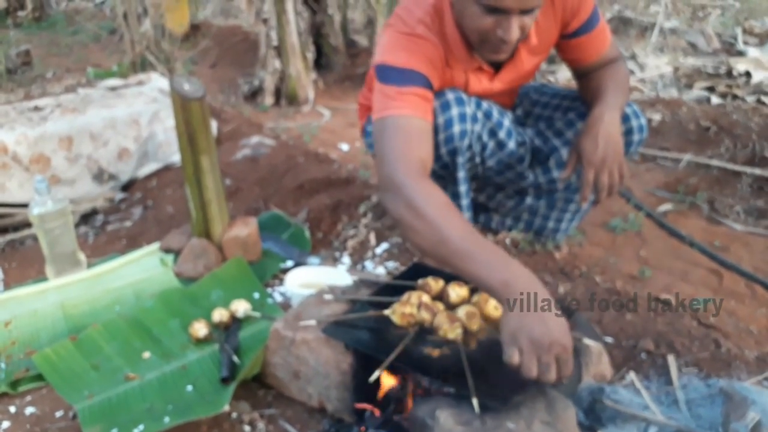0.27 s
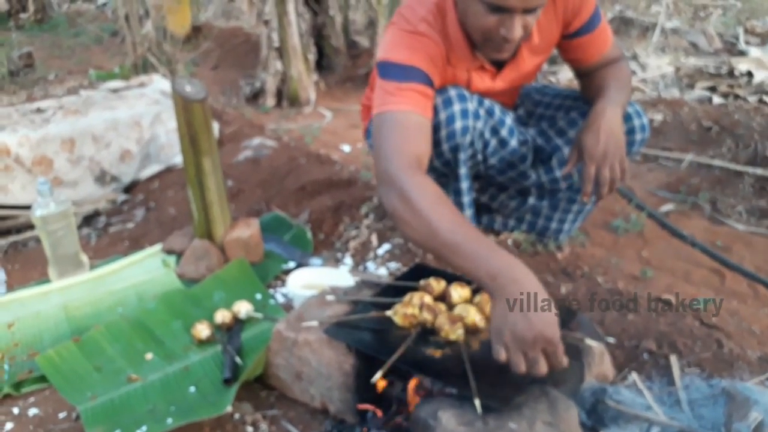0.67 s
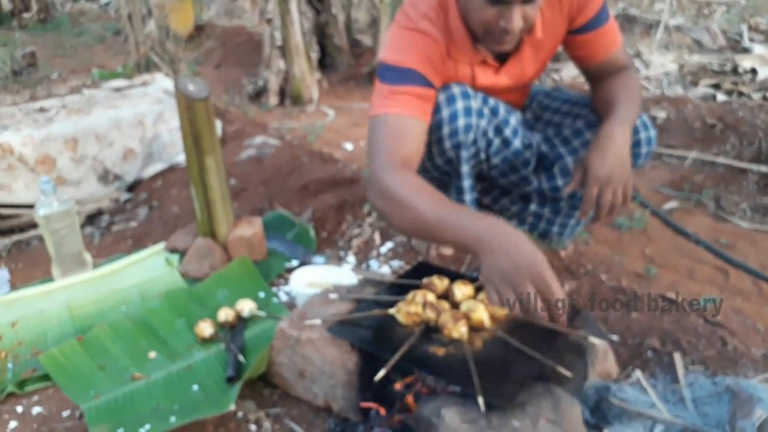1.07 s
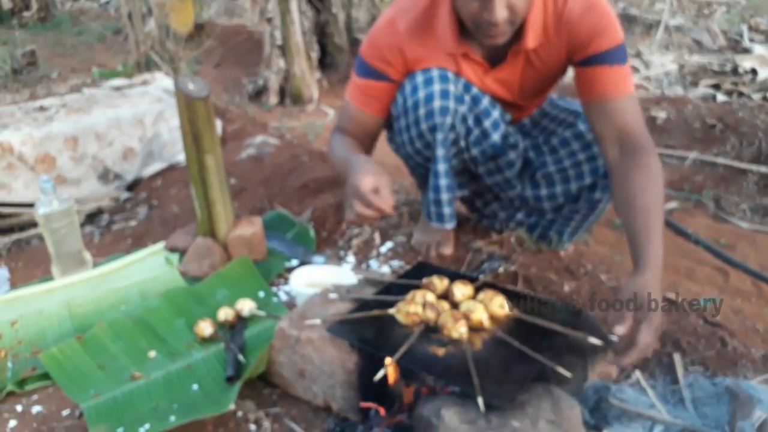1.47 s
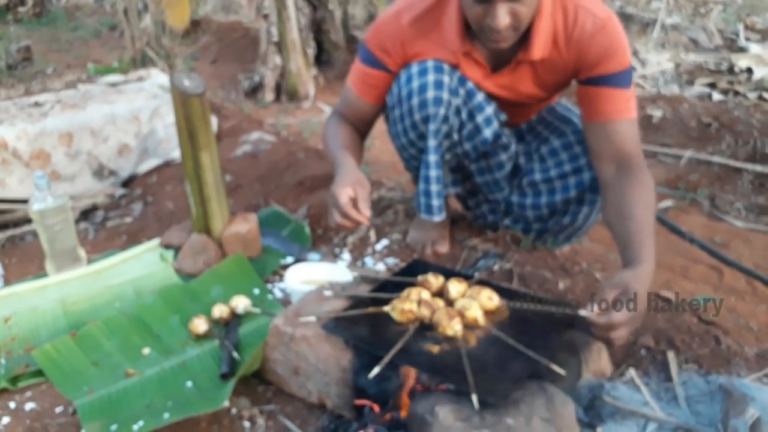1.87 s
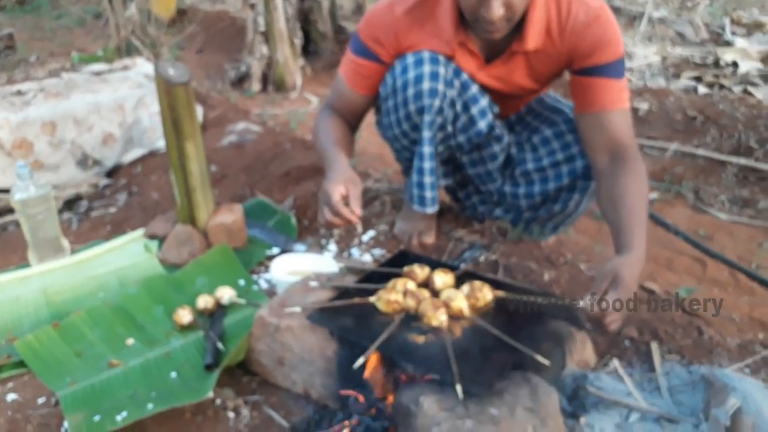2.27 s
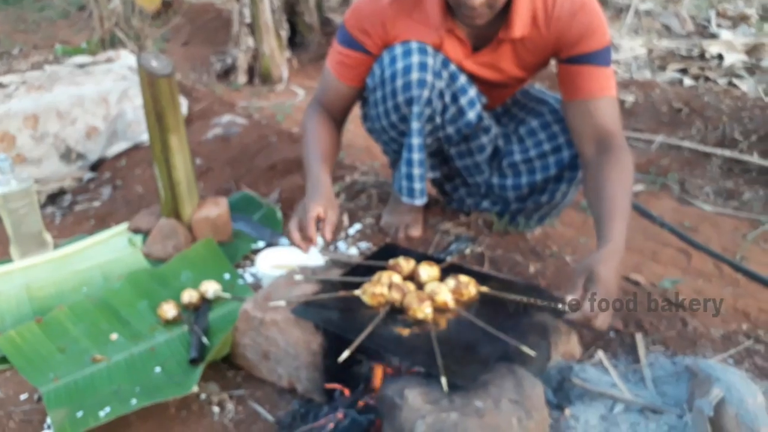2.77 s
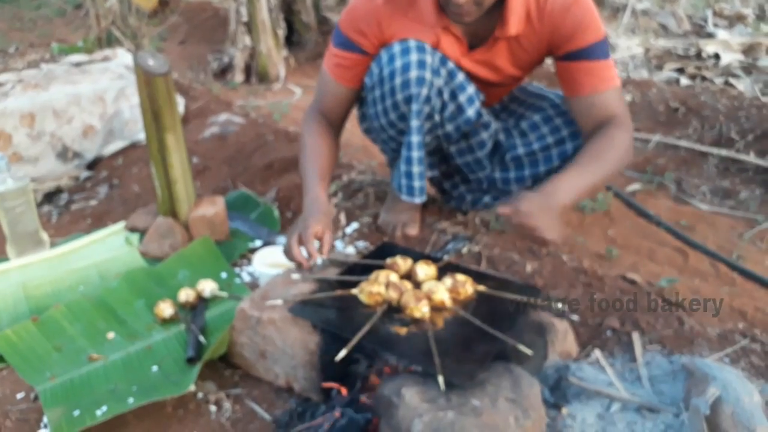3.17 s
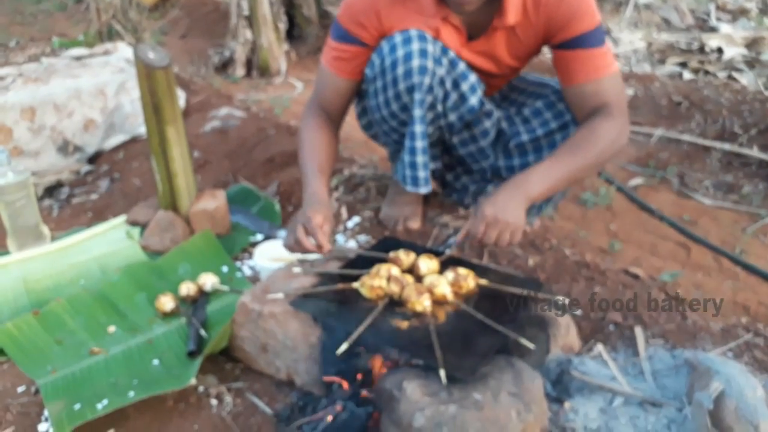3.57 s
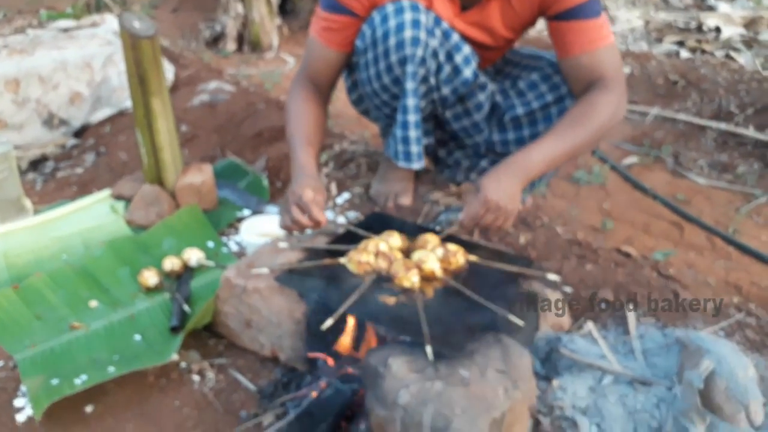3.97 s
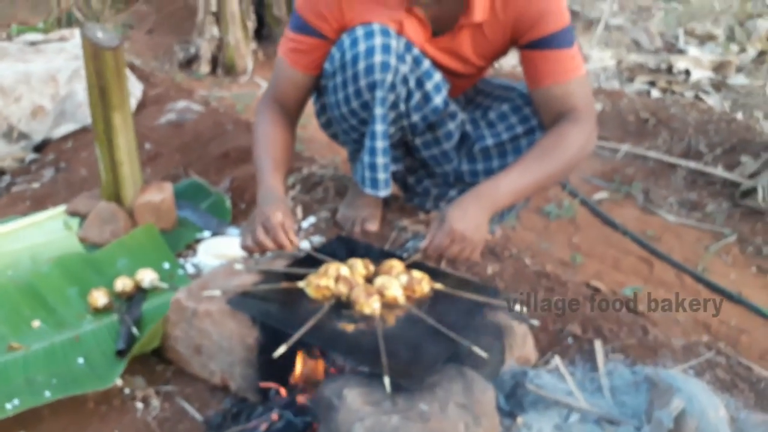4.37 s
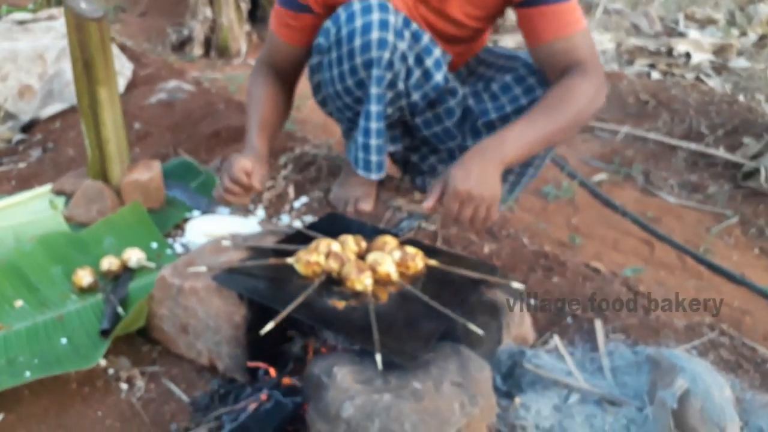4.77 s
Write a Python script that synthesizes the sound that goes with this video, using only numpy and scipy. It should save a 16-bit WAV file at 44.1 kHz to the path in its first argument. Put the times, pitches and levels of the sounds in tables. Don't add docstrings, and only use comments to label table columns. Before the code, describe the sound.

Close to a hand-held camera outdoors, oil fries steadily in a flat pan, bright and crackly, with a sharp pop around one and a half seconds. A small bird gives short falling whistles that echo among trees. Fingers tap the camera body softly, then scrape the microphone just before four seconds, and the sizzle turns dull and muffled to the end.

```python
import sys
import numpy as np
from scipy import signal
from scipy.fft import rfft, irfft, next_fast_len
from scipy.io import wavfile
from scipy.ndimage import uniform_filter1d, map_coordinates

SR = 44100
rng = np.random.default_rng(int(sys.argv[2]) if len(sys.argv) > 2 else 0)


def output_pcm(signal):
    pcm = np.clip(np.atleast_2d(signal).T, -1, 1) * 32767
    wavfile.write(sys.argv[1], SR, np.round(pcm).astype(np.int16))


def level_to_linear(level):
    exponent = np.asarray(level, float) / 20
    return 10 ** exponent


N = 221776


def unit(x):
    return x / np.sqrt(np.mean(x ** 2) + 1e-20)


def noise():
    return rng.standard_normal(N)


def along(points, hz):
    f, v = np.transpose(points)
    return np.interp(np.log(hz + 1), np.log(f + 1), v)


def curves(rows, size=N):
    s, *columns = np.transpose(rows)
    return [np.interp(np.arange(size) / SR, s, column) for column in columns]


def wobble(rate):
    knots = rng.standard_normal(int(N * rate / SR) + 4)
    return map_coordinates(knots, [np.arange(N) * rate / SR])


def filtered(x, response):
    m = next_fast_len(N + SR // 2)
    return irfft(rfft(x, m) * response(np.fft.rfftfreq(m, 1 / SR)), m)[..., :N]


def butter(x, order, hz, kind="low"):
    return signal.sosfilt(signal.butter(order, hz, kind, fs=SR, output="sos"), x)


def coloured(x, spectrum):
    cepstrum = irfft(np.log(level_to_linear(along(spectrum, np.fft.rfftfreq(4096, 1 / SR))) + 1e-6))
    cepstrum[1:2048] *= 2
    cepstrum[2049:] = 0
    response = irfft(np.exp(rfft(cepstrum)))[:2048]
    return signal.fftconvolve(x, response)[:len(x)]


# start_s, level_db
VIGOUR = [(0.0, -55.5), (0.27, -53), (0.55, -54.5), (1.12, -50.5), (1.69, -55.5), (1.89, -52.5),
          (2.13, -53.5), (2.23, -52), (3.4, -55), (3.73, -51.5), (3.84, -49.5), (4.41, -52), (4.92, -53.5),
          (5.03, -58.5)]


def frying_vigour():
    return curves(VIGOUR)[0]


# start_s, covered_share (0-1)
HAND_COVER = [
    (0, 0.26),
    (3.55, 0.28),
    (3.7, 0.41),
    (3.86, 0.64),
    (3.92, 0.91),
    (4.3, 0.96),
    (4.65, 1),
    (5.03, 1),
]


def hand_cover():
    return curves(HAND_COVER)[0]


# pitch_hz, level_db per Hz
OPEN_PORT = [(710, -58.5), (1200, -25.5), (1900, -15.5), (2830, -10.5), (3360, 2), (6950, 6.5), (8080, 2.5),
             (9610, -13.5), (12700, -15.5), (16000, -18)]
# pitch_hz, level_db per Hz
COVERED_PORT = [(710, -44.5), (1200, -50), (1850, -23), (2230, -11), (3180, -17), (3740, -1.5), (4130, -2),
                (5780, -11.5), (9210, -28.5), (12900, -21), (16000, -30.5)]


def at_port(x):
    def levelled(v):
        main_band = filtered(v, lambda hz: (hz > 3200) & (hz < 6000))
        return v / np.std(main_band)

    cover = hand_cover()
    return (1 - cover) * levelled(coloured(x, OPEN_PORT)) + cover * levelled(coloured(x, COVERED_PORT))


def ticks(per_second, spread_db, clump_db, clump_rate):
    moment, luck, direction = rng.random((3, N))
    size_db = np.minimum(-spread_db * np.log(luck + 1e-9), 15) + clump_db * wobble(clump_rate)
    return unit((moment < per_second / SR) * np.sign(direction - .5) * level_to_linear(size_db))


def patchy(x, depth_db):
    t, z = signal.stft(x, SR, nperseg=256)[1:]
    field = uniform_filter1d(rng.standard_normal(z.shape), size=8, axis=0)
    field = unit(uniform_filter1d(field, size=5, axis=1))
    depth = np.interp(t, np.arange(N) / SR, depth_db)
    return signal.istft(z * level_to_linear(-depth * abs(field)), SR, nperseg=256)[1][:N]


# pitch_hz, sharpness_q
POCKET_SIZES = [
    (3700, 1.85),
    (5400, 4.2),
    (7400, 7.3),
    (12500, 1.9),
]


def sizzle():
    cover, body_db = hand_cover(), frying_vigour()
    spray_db = body_db - 2.5 - 1.15 * np.arange(N) / SR - 15 * cover
    clumps = level_to_linear(np.minimum(1.1 * wobble(90), 1.5) + 0.3 * wobble(10))
    bed = clumps * noise()
    bursts = level_to_linear(-1.0) * ticks(per_second=720, spread_db=3.0, clump_db=4.0, clump_rate=120)
    for hz, q in POCKET_SIZES:
        b, a = signal.iirpeak(hz, max(q, .3), SR)
        pushes = ticks(per_second=420, spread_db=5.0, clump_db=1.0, clump_rate=29)
        bursts = bursts + 1.48 * signal.lfilter(b, a, pushes)
    fading = signal.lfilter([1], [1, -level_to_linear(-120 / (0.006 * SR))], bursts ** 2)
    bursts = clumps ** 0.5 * (bursts + 0.2 * np.sqrt(fading) * noise())
    sound = at_port(level_to_linear(-7.0) * unit(bed) + unit(bursts))
    spray = filtered(sound, lambda hz: 1 / (1 + (9000 / (hz + 1)) ** 12))
    slow_level = np.sqrt(abs(uniform_filter1d(spray ** 2, size=SR // 5, mode="reflect")))
    patches = patchy(spray / slow_level, 2 + 3 * cover)
    return level_to_linear(body_db) * (sound - spray) + level_to_linear(spray_db + 7.5) * patches


def minor_spits():
    per_second = 34
    count = int(per_second * N / SR)
    s = (np.arange(count) + rng.random(count)) / per_second
    size, pitch, spray = np.clip(rng.standard_normal((count, 3)), -1.6, 1.6).T
    cover = hand_cover()[(s * SR).astype(int)]
    hz = (6500 + (4440 - 6500) * cover) * np.exp(0.087 * pitch)
    return np.transpose([s + .001, -41 + 3 * size, hz, -30 + 2 * spray - 29 * cover])


# start_s, peak level_db, pocket pitch_hz,
# spray_db
DISTINCT_SPITS = [(0.0074, -32.0, 7100.0, -16), (0.0819, -34.0, 6050.0, -19), (0.0844, -31.5, 6640.0, -9),
                  (0.1285, -32.0, 4780.0, -15), (0.1495, -33.5, 6250.0, -10), (0.3655, -32.5, 5610.0, -31),
                  (0.3853, -35.5, 7860.0, -18), (0.443, -33.0, 6210.0, -11), (0.4744, -34.5, 6710.0, -9),
                  (0.5508, -35.5, 4780.0, -18), (0.5547, -33.0, 6230.0, -19), (0.634, -33.0, 6220.0, -12),
                  (0.6522, -33.5, 7140.0, -15), (0.6793, -33.0, 6130.0, -15), (0.8084, -32.0, 5860.0, -14),
                  (0.8775, -30.5, 5370.0, -10), (0.9068, -32.5, 7140.0, -7), (0.9334, -28.0, 5710.0, -1),
                  (0.9648, -30.0, 4930.0, -14), (0.9699, -27.0, 7290.0, -16), (1.0087, -32.0, 6880.0, -16),
                  (1.0317, -30.5, 7090.0, -7), (1.0751, -30.0, 7340.0, -11), (1.1299, -26.0, 7350.0, -11),
                  (1.2188, -21.5, 6620.0, -9), (1.2587, -30.0, 6060.0, -20), (1.3506, -33.5, 7240.0, -16),
                  (1.3597, -32.0, 6860.0, -16), (1.4142, -31.5, 7230.0, -10), (1.4433, -32.0, 6710.0, -10),
                  (1.4576, -14.0, 5450.0, -21), (1.4605, -28.5, 5720.0, -18), (1.5032, -33.0, 6050.0, -7),
                  (1.512, -31.0, 5710.0, -9), (1.5163, -30.0, 6330.0, -10), (1.5225, -30.0, 6540.0, -12),
                  (1.5629, -29.5, 7060.0, -10), (1.5719, -33.5, 5630.0, -12), (1.5757, -26.5, 4700.0, -16),
                  (1.6007, -34.0, 6940.0, -7), (1.6441, -31.5, 6180.0, -11), (1.6488, -33.5, 5170.0, -16),
                  (1.778, -32.0, 7130.0, -16), (1.7934, -29.5, 6420.0, -6), (1.8204, -36.0, 7250.0, -12),
                  (1.9715, -29.0, 6040.0, -2), (2.0259, -28.0, 5200.0, -18), (2.1697, -30.5, 6030.0, -10),
                  (2.19, -34.0, 6300.0, -16), (2.2272, -27.5, 6690.0, -11),
                  (3.5454, -31.0, 6510.0, -13), (3.5667, -34.5, 5660.0, -16), (3.6091, -28.5, 6050.0, -16),
              (3.6138, -34.0, 5250.0, -11), (3.6316, -32.0, 4080.0, -26), (3.7582, -21.5, 5210.0, -11),
              (3.7727, -24.5, 4820.0, -26), (3.7838, -26.5, 5140.0, -17), (3.7984, -24.0, 4960.0, -26),
              (3.8014, -26.0, 4370.0, -9), (3.8855, -10.5, 5340.0, -25), (3.8937, -11.5, 4240.0, -21),
              (3.9789, -29.5, 4760.0, -18), (4.0156, -35.0, 4380.0, -22), (4.0321, -33.0, 4230.0, -27),
              (4.0422, -34.0, 4920.0, -29), (4.1141, -32.5, 4480.0, -13), (4.1656, -34.5, 5010.0, -21),
              (4.1798, -33.5, 4090.0, -22), (4.1992, -33.5, 5170.0, -22), (4.2327, -33.5, 4060.0, -28),
              (4.2626, -33.0, 4020.0, -6), (4.2774, -33.0, 4160.0, -25), (4.2946, -36.5, 5080.0, -24),
              (4.3122, -34.5, 4740.0, -20), (4.3202, -34.0, 5360.0, -19), (4.3283, -24.0, 4810.0, -23),
              (4.3463, -30.5, 4180.0, -11), (4.3494, -35.0, 4310.0, -21), (4.377, -28.0, 4030.0, -26),
              (4.3964, -33.5, 4450.0, -23), (4.4268, -35.0, 4190.0, -26), (4.4308, -35.5, 4390.0, -30),
              (4.4626, -30.0, 4330.0, -35), (4.4807, -33.5, 4550.0, -35), (4.5213, -38.0, 4270.0, -26),
              (4.5405, -33.0, 4160.0, -28), (4.5673, -34.0, 4440.0, -26), (4.583, -35.5, 4310.0, -26),
              (4.6114, -38.0, 4270.0, -32), (4.6209, -26.5, 4150.0, -25), (4.6385, -33.5, 4320.0, -26),
              (4.6463, -29.5, 4210.0, -27), (4.7548, -30.0, 4560.0, -46), (4.767, -27.5, 4100.0, -24),
              (4.8243, -30.5, 4220.0, -34), (4.841, -26.5, 4300.0, -22), (4.8758, -34.0, 4320.0, -29),
              (4.9237, -37.5, 4160.0, -21),
                  (2.2426, -31.0, 6740.0, -13), (2.2559, -27.5, 6280.0, -4), (2.2619, -30.0, 6690.0, -10),
                (2.2649, -30.0, 5360.0, -15), (2.2672, -27.0, 4350.0, -15), (2.3, -32.0, 6110.0, -22),
                (2.3282, -33.0, 7040.0, -17), (2.359, -31.5, 6200.0, -26), (2.4085, -29.0, 5450.0, -5),
                (2.546, -26.5, 4610.0, -27), (2.5562, -29.0, 5220.0, -13), (2.59, -31.0, 3920.0, -14),
                (2.6297, -30.0, 6580.0, -15), (2.677, -23.0, 6140.0, -14), (2.6805, -35.0, 7340.0, -10),
                (2.69, -31.0, 6480.0, -26), (2.7154, -31.0, 6850.0, -11), (2.7434, -31.0, 6700.0, -18),
                (2.7519, -31.5, 5620.0, -11), (2.8015, -29.0, 6160.0, -13), (2.8238, -28.0, 6010.0, -9),
                (2.8648, -34.5, 5060.0, -22), (2.8928, -35.5, 6820.0, -4), (2.9232, -35.0, 6070.0, -7),
                (2.9339, -33.5, 6380.0, -20), (2.9552, -32.5, 6450.0, -4), (2.9603, -29.5, 6610.0, -13),
                (2.9663, -30.5, 7430.0, -13), (2.9714, -27.0, 5550.0, -18), (2.9894, -28.5, 6950.0, -19),
                (3.0273, -32.0, 6530.0, -19), (3.0607, -31.5, 5160.0, -28), (3.0634, -32.5, 6150.0, -26),
                (3.0762, -32.5, 5520.0, -5), (3.1217, -33.0, 7270.0, -7), (3.1266, -36.0, 6900.0, -10),
                (3.1395, -34.5, 6530.0, -13), (3.1456, -36.5, 7140.0, -8), (3.1737, -26.5, 4800.0, -9),
                (3.1793, -32.0, 6550.0, -13), (3.1934, -33.0, 6250.0, -7), (3.2322, -36.0, 6370.0, -20),
                (3.322, -33.0, 6920.0, -15), (3.3311, -30.0, 4810.0, -4), (3.3729, -21.0, 6660.0, -9),
                (3.4157, -30.0, 4800.0, -38), (3.4605, -32.0, 6670.0, -14), (3.4922, -22.5, 5920.0, -19),
                (3.5098, -31.5, 6740.0, -23)]


def spits():
    body, mist, t = np.zeros(N + SR), np.zeros(N + SR), np.arange(600) / SR
    pockets = [*DISTINCT_SPITS, *minor_spits()]
    hisses = rng.standard_normal((len(pockets), 3, len(t)))
    for (s, db, hz, spray_db), hiss in zip(pockets, hisses):
        swing = t * hz / 0.6
        tone = np.sin(2 * np.pi * hz * t)
        cavity = tone * swing * np.exp(1 - swing)
        landing_db = np.minimum(20 * uniform_filter1d(hiss[2], size=30), 3)
        scatter = uniform_filter1d(hiss[1], size=8) * level_to_linear(landing_db)
        drops = level_to_linear(-8.5) * scatter * tone * level_to_linear(-60 * t / 0.032)
        spray = np.sign(hiss[0]) * (level_to_linear(-60 * t / 0.0012) + 0.12 * level_to_linear(-60 * t / 0.009))
        start = round((s - .0003) * SR)
        body[start:][:len(t)] += level_to_linear(db + 2.2) * (cavity + drops)
        mist[start:][:len(t)] += level_to_linear(db + spray_db + 3.5) * spray
    cover = hand_cover()
    free, shaded = butter(body, 3, 9700)[:N], butter(body, 3, 6770)[:N]
    body = butter((1 - cover) * free + cover * shaded, 5, 2900, "high")
    return body + butter(mist, 4, 8800, "high")[:N]


# start_s, level_db, pitch_hz
BUBBLES = [
    (1.143, -60, 2000),
    (1.162, -63, 1810),
    (2.2668, -56.5, 1810),
    (2.546, -63.5, 1780),
    (4.797, -56, 2220),
    (5.008, -57, 2250),
    (5.024, -58, 2160),
    (3.699, -58, 1660),
]


def blisters():
    out, t = np.zeros(N + SR), np.arange(900) / SR
    for s, db, hz in BUBBLES:
        rough = 1 + 3 * uniform_filter1d(rng.standard_normal(len(t)), size=24)
        envelope = level_to_linear(-60 * t / 0.036) * (1 - np.exp(-t / 0.000055))
        ring = rough * np.sin(2 * np.pi * hz * t * (1 + 30 * t)) * envelope
        out[round((s - .0015) * SR):][:len(t)] += level_to_linear(db + 9.0) * ring
    return butter(out, 4, 1500, "high")[:N]


# start_s (at the peak), level_db, sharpness_hz
FINGER_TAPS = [(1.001, -51.5, 145), (2.0843, -49, 423), (2.1543, -61, 300), (2.1773, -42, 492),
               (2.1829, -49, 496), (2.1882, -42, 403), (2.241, -43.5, 404), (2.3207, -41.5, 650),
               (2.3613, -49, 395), (2.3721, -50, 295), (2.6408, -35, 720), (2.7152, -36.5, 1950),
               (2.868, -48, 400), (3.675, -43, 226), (3.891, -33.5, 118), (4.0788, -49.5, 205),
               (4.1302, -51, 296), (4.322, -53, 140), (4.4334, -53, 150), (4.7833, -43.5, 250)]


def taps():
    out, t = np.zeros(N + SR), np.arange(-700, 700) / SR
    cover = hand_cover()
    for s, db, hz in FINGER_TAPS:
        way = np.sign(cover[round(s * SR)] - .5)
        u = t * hz * 3.03
        push = level_to_linear(db) * (1 - 1.34 * abs(u) ** 0.92) * np.exp(-abs(u) ** 1.42)
        out[round(s * SR) - 700:][:len(t)] += way * push
    return butter(out, 2, 105, "high")[:N]


# start_s, rise_s, hold_s, level_db
DRAGS = [
    (3.668, .010, .004, -31),
    (3.8793, .0055, .0135, -23.5),
    (4.28, .04, .04, -59),
    (2.173, .009, .004, -54),
    (2.32, .04, .03, -67),
]
# pitch_hz, level_db per Hz
RASP_COLOUR = [(35, -30), (60, -3.5), (636, -4), (1200, -6.5), (2710, -3), (5210, -6), (6430, -2),
               (9350, -25.5), (16000, -18.5)]


def scrapes():
    slips = unit(coloured(level_to_linear(2.5 * wobble(700)) * noise(), RASP_COLOUR))
    out = np.zeros(N)
    for s, rise, hold, db in DRAGS:
        end = s + rise + hold
        level_db, = curves([(s - rise / 2, -140), (s, db - 8), (s + rise, db), (end, db - 6),
                            (end + 0.2 * rise, db - 61), (end + 1.7 * rise, -140)])
        out += slips * level_to_linear(level_db)
    return out


# start_s, first pitch_hz, last pitch_hz, level_db
BIRD_CHIRPS = [
    (0.17, 4980, 4070, -43.5),
    (1.113, 5000, 4010, -43),
    (1.867, 4850, 4034, -42),
    (3.676, 5020, 4180, -44),
    (4.766, 4800, 4270, -44.5),
]
# start_s, tone level_db, octave level_db
CHIRP_SHAPE = [
    (0, -20.5, -51),
    (.012, -2, -48),
    (.028, -8.5, -0.5),
    (.04, -4, 0.5),
    (.052, -40, -29),
]
# pitch_hz, t60_s
TREE_ECHOES = [
    (2000, .6),
    (4500, .6),
    (9000, .25),
]


def bird():
    dry, size = np.zeros(N + SR), 2800
    tone_db, octave_db = curves(CHIRP_SHAPE, size=size)
    cover = hand_cover()
    fall = np.clip(np.arange(size) / SR / .042, 0, 1) ** .9
    for s, first_hz, last_hz, db in BIRD_CHIRPS:
        start = round(s * SR)
        phase = 2 * np.pi * np.cumsum(first_hz + (last_hz - first_hz) * fall) / SR
        shade_db = 80 * np.maximum(cover[start] - .2, 0)
        octave = level_to_linear(octave_db - shade_db) * np.sin(2 * phase)
        dry[start:][:size] += level_to_linear(db + 2.5) * (level_to_linear(tone_db) * np.sin(phase) + octave)
    dry = dry[:N] * level_to_linear(2.2 * wobble(400))
    hz, t, z = signal.stft(rng.standard_normal(SR // 2), SR, nperseg=256)
    tail = signal.istft(z * level_to_linear(-60 * t / along(TREE_ECHOES, hz)[:, None]), SR, nperseg=256)[1]
    echoes = signal.fftconvolve(dry, tail / np.linalg.norm(tail))[:N]
    rustle = .95 + .2 * wobble(600)
    trunk = level_to_linear(-7.5) * np.roll(dry, round(.038 * SR))
    return level_to_linear(0.5) * (dry + trunk) + level_to_linear(2.5) * rustle * echoes


# pitch_hz, level_db per Hz
AIR_COLOUR = [(15, -45), (25, -10.5), (112, 6), (257, -4), (386, -10.5), (954, -12.5), (2400, -10.5),
              (5500, -120)]


def fire():
    vigour_db = frying_vigour()
    rumble_db = -80.5 + 4.5 * hand_cover()
    murmur_db = -77.5 + 0.66 * (vigour_db - vigour_db.mean())

    def air(hz):
        return level_to_linear(along(AIR_COLOUR, hz))

    low = filtered(noise(), lambda hz: air(hz) / (1 + (hz / 260) ** 4))
    mid = filtered(noise(), lambda hz: air(hz) / (1 + (260 / (hz + 1)) ** 4))
    flutter_db, stir_db = 1.8 * wobble(25), 1.2 * wobble(30)
    return level_to_linear(rumble_db + 2.0 + flutter_db) * unit(low) + level_to_linear(murmur_db + 1.0 + stir_db) * unit(mid)


def scene():
    mono = sizzle() + spits() + blisters() + taps() + scrapes() + bird() + fire()
    return np.tile(mono, (2, 1))


def top_cut(x):
    return signal.sosfilt(signal.butter(12, 16830, fs=SR, output="sos"), x)


# pitch_hz, level_db per Hz
HISS_COLOUR = [(25, -1), (60, -3.5), (500, -12), (1200, -15.5), (3000, -10), (6000, -15), (10000, -15),
               (15000, -13)]


def record(dry):
    top_hz = 15750
    mid = filtered(dry[0], lambda hz: 1 / (1 + (hz / top_hz) ** 200))
    hiss = filtered(noise(), lambda hz: level_to_linear(along(HISS_COLOUR, hz)) * (hz < top_hz))
    side = level_to_linear(-81.5) * unit(hiss)
    return top_cut(np.array([mid + side, mid - side]))


dry = scene()
out = record(dry)
output_pcm(out)
```